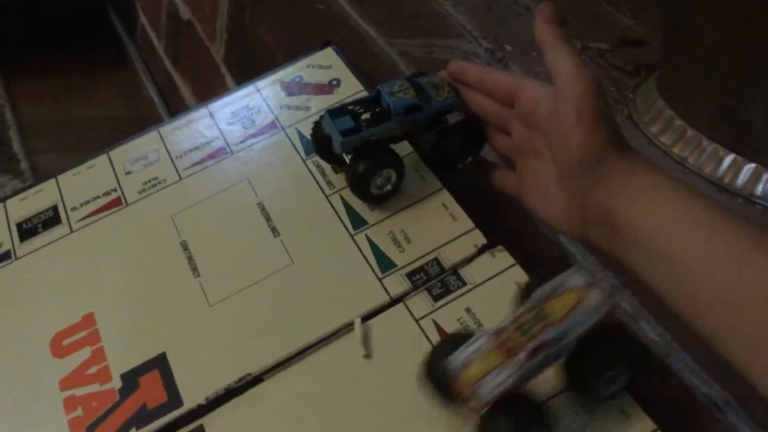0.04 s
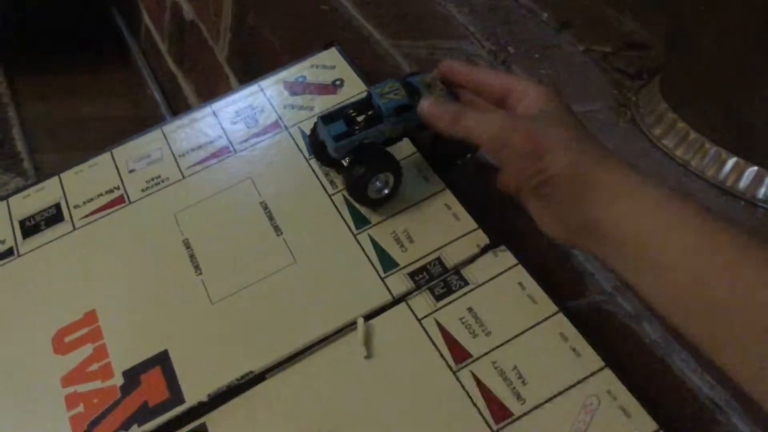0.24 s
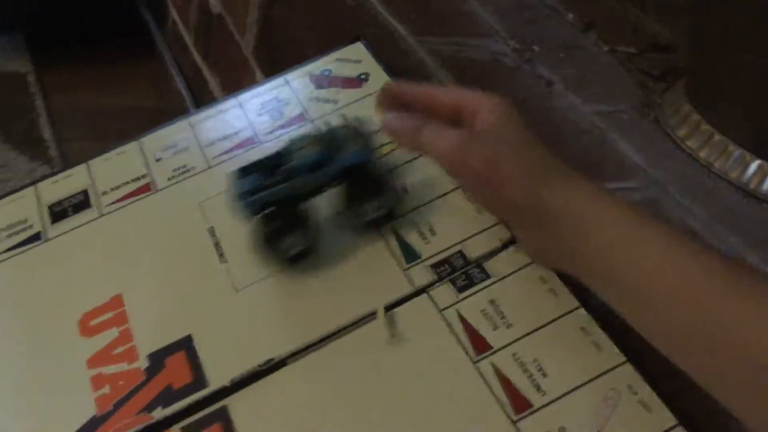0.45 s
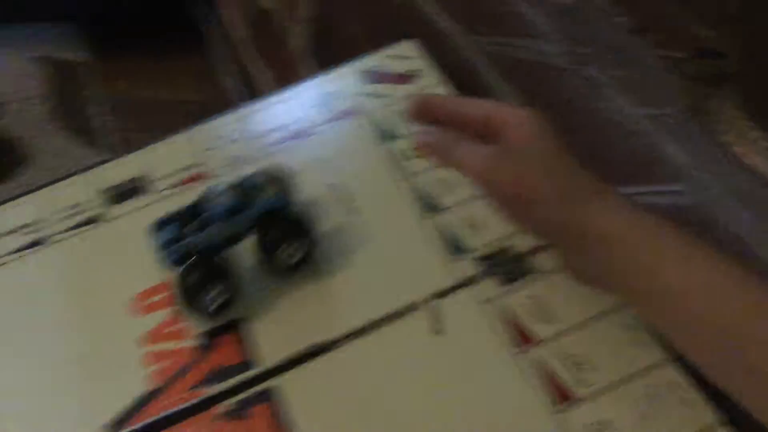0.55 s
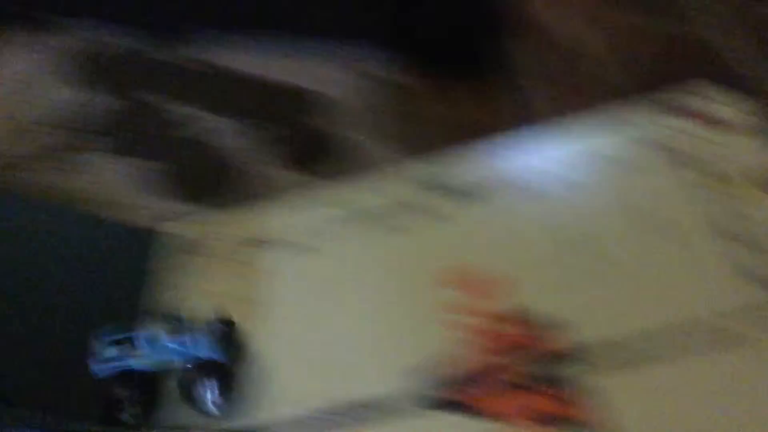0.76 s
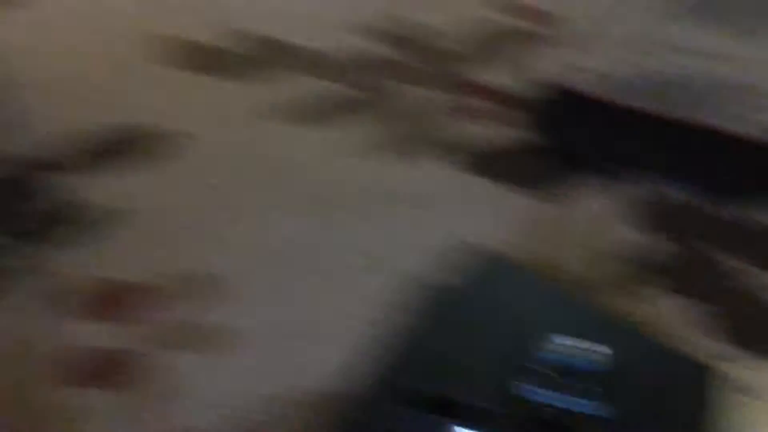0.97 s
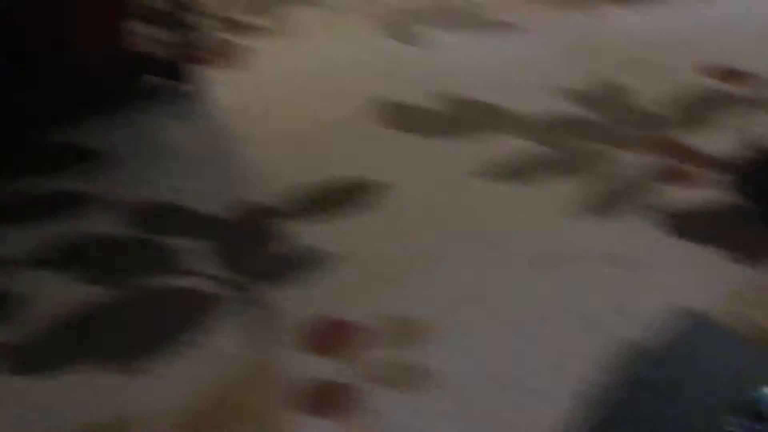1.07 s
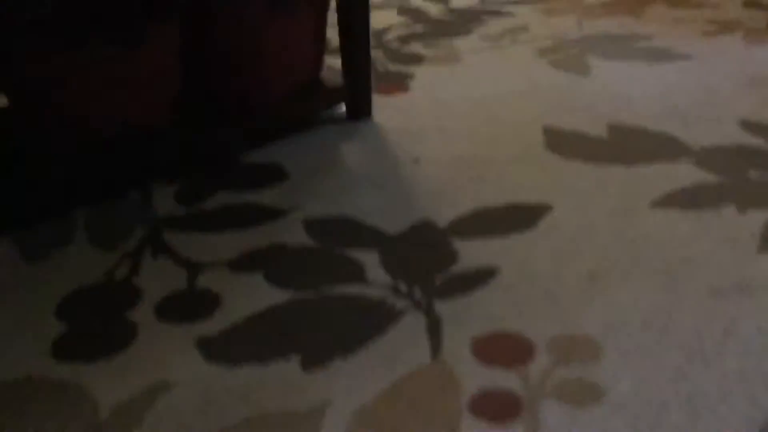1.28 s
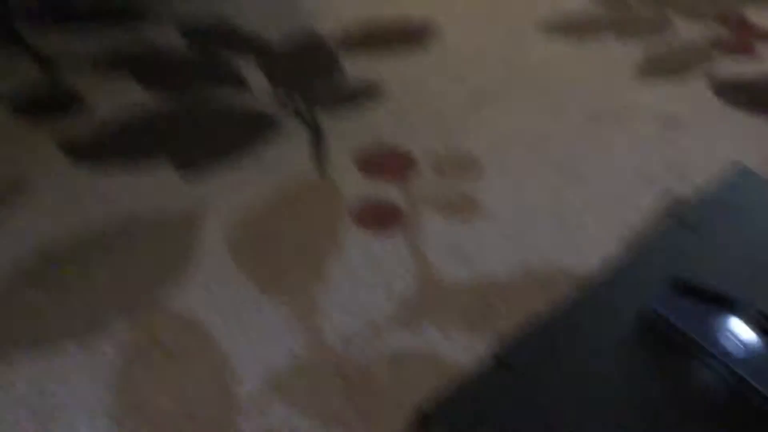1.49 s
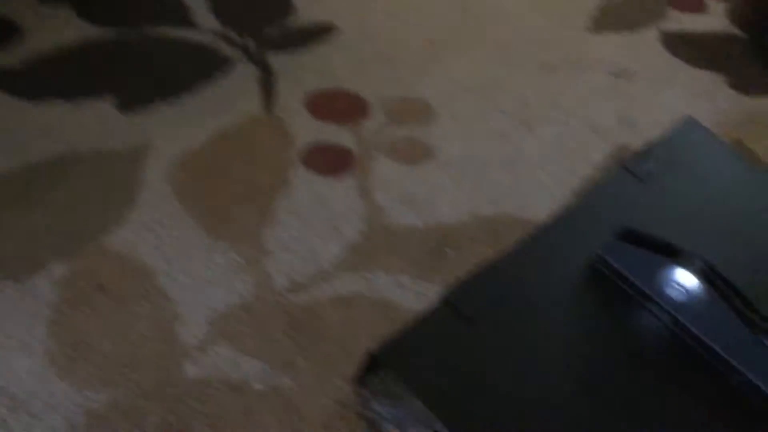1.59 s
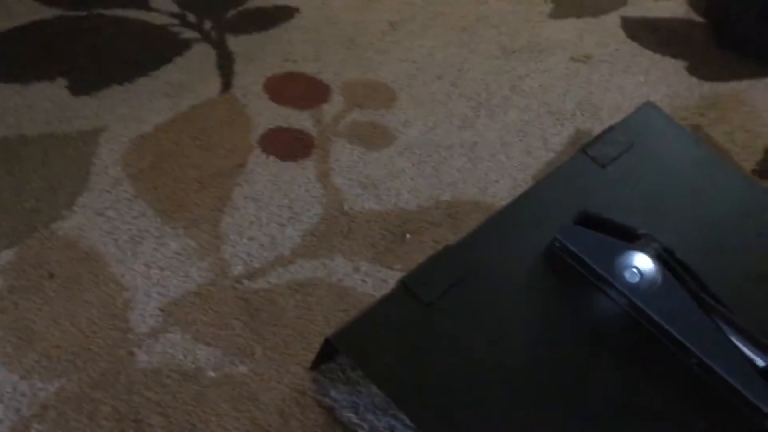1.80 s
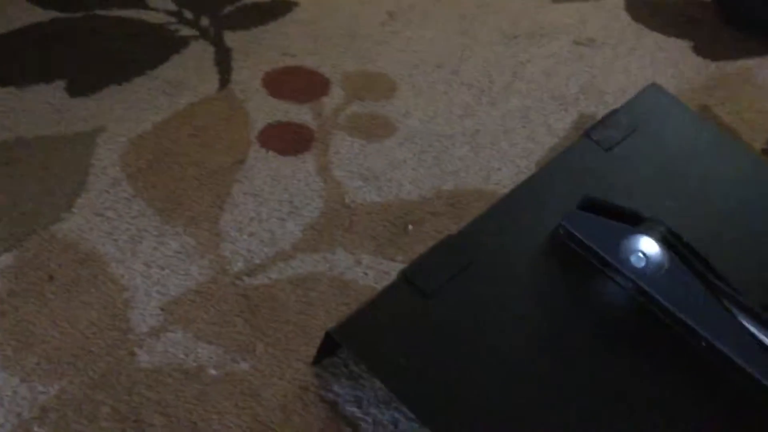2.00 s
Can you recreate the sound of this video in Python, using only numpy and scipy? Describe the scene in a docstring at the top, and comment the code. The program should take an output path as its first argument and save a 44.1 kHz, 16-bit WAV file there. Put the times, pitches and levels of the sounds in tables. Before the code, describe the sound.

Toy truck drumming and clattering down a cardboard slope, landing hard and bumping to a stop.

```python
"""In a small living room, a toy monster truck is let go on a sloping cardboard game board.
Its knobbly tyres drum on the board, plastic parts rattle and the loose steel axles jingle.
It clatters over the fold, crashes onto a hollow case whose modes ring, slows almost to rest,
rolls again and bumps to a stop. The room adds a short reverberation, quiet air and a faint hiss."""
import sys
import numpy as np
from scipy import signal
from scipy.fft import rfft, irfft, next_fast_len
from scipy.io import wavfile
from scipy.ndimage import uniform_filter1d

SR = 44100
rng = np.random.default_rng(int(sys.argv[2]) if len(sys.argv) > 2 else 0)


def log_audio(samples):
    """Write samples as a 16-bit WAV file to the path given in sys.argv[1]."""
    # one column per channel
    frames = np.atleast_2d(samples).T
    # limit to full scale, then quantise
    limited = np.clip(frames, -1, 1)
    pcm = np.round(limited * 32767).astype(np.int16)
    wavfile.write(sys.argv[1], SR, pcm)


N = 90404
RELEASE_S, LANDING_S = .17, .89

# impacts of the truck: start_s, thud_db, clack_db, tick_db
IMPACTS = [(0.086, -28, -80, -63), (.154, -23.5, -53, -69), (0.172, -55, -43.5, -46),
           (0.337, -13, -33.5, -43.5), (0.542, -42, -31, -47), (0.571, -18, -13, -26),
           (0.575, -46, -22, -28), (0.596, -11, -19, -31.5), (0.6148, -11.5, -20.5, -20.5),
           (0.628, -37, -20, -54), (0.653, -11.5, -36, -50.5), (0.763, -10, -52, -40),
           (0.8998, -26, -12, -19.5), (0.911, -41, -24, -35), (0.937, -35, -28, -24),
           (0.945, -27, -17.5, -22), (0.957, -15, -21, -26), (0.969, -28, -22, -24), (1.0, -38, -25, -24),
           (1.006, -36, -29, -26), (1.016, -44, -32, -25), (1.0798, -11, -20.5, -36),
           (1.09, -25, -20.5, -32), (1.1109, -23.5, -31.5, -30.5), (1.132, -38, -45, -32),
           (1.139, -31, -38, -32.5), (1.263, -26.5, -57, -40.5), (1.308, -35.5, -65, -50),
           (1.395, -51, -52.5, -48), (1.747, -33, -37, -56), (1.755, -12, -35, -41),
           (1.777, -28, -39.5, -58)]
# drumming of the tyres on the case: time_s, level_db
CASE_DRUMMING = [(.9, -25.5), (1.04, -30.5), (1.14, -31), (1.29, -41), (1.36, -55), (1.45, -56.5),
                 (1.53, -42), (1.66, -38.5), (1.78, -33.5), (1.84, -41), (1.9, -54), (2.05, -63.5)]
# shaking of the axles and loose parts: time_s, level_db
SHAKING = [(.16, -69), (.18, -48), (.35, -53.5), (.55, -51.5), (.62, -47), (.7, -41.5), (.8, -43.5),
           (.87, -49), (.98, -38), (1.06, -43), (1.14, -40.5), (1.22, -51.5), (1.34, -62), (1.5, -65.5),
           (1.72, -63), (1.85, -67.5)]
# spectrum of the case's lid, also of the noise in every thud: frequency_hz, level_db
LID_SPECTRUM = [(40, -63), (110, -39.5), (170, -5), (225, -6.5), (295, 3.5), (430, -4.5), (700, -17.5),
                (1200, -31), (2200, -36), (6000, -58)]


def impacts():
    """Impulse excitation: each blow thuds in the panel, clacks in the shell and ticks in the axles."""
    # low modes of a struck panel: pitch_hz, level_db, t60_s
    panel_modes = [(288, 0, .12), (330, -10, .07), (400, -9, .06)]
    # spectra of plastic on the board, plastic on the case and the axles: frequency_hz, level_db
    board_clack = [(60, -38), (450, 13), (780, 5.5), (1120, 13.5), (1400, 5.5), (1650, 4), (2100, 1),
                   (3100, -1), (5200, -10.5), (16000, -64)]
    case_clack = [(60, -26.5), (450, 18.5), (780, 7), (1080, 12.5), (1400, 2), (1800, 8.5), (2400, -3.5),
                  (3400, -4), (4500, -13), (16000, -17.5)]
    axle_tick = [(300, -23), (1500, 2.5), (3500, 0), (5200, -3), (7000, -2.5), (11500, -3.5), (13500, -6.5),
                 (16000, -21)]
    panel, board, case, metal = map(impulse_response, (LID_SPECTRUM, board_clack, case_clack, axle_tick))
    out, t = np.zeros(N), np.arange(SR // 4) / SR

    def burst(response, t60_s):
        noise = rng.standard_normal(len(t)) * amp(-60 * t / t60_s)
        return convolve(noise * onset(t, rise_s=.0004), response)

    for start_s, thud_db, clack_db, tick_db in IMPACTS:
        # the panel's pitch shifts with the place where it is struck
        modes = onset(t, rise_s=.0022) * damped_modes(panel_modes, vary_db=4.2, detune=.025)
        thud = amp(-4.5) * modes + amp(-13) * burst(panel, t60_s=.04)
        clack = burst(board if start_s < LANDING_S else case, t60_s=.07)
        tick = burst(metal, t60_s=.032)
        crack = amp(2.5) * burst(metal, t60_s=.0047)
        add(out, start_s, amp(thud_db) * thud + amp(clack_db) * clack + amp(tick_db) * (tick + crack))
    return out


def rolling():
    """Forced vibration: the tyres drive the board, whirring as they gather speed, then the case."""
    # drumming on the board and whirr of the tyres: time_s, level_db
    board_drumming = [(0, -66), (.11, -59), (.16, -39.5), (.2, -33), (.22, -24.5), (.36, -25), (.46, -22),
                      (.5, -28), (.56, -25), (.66, -20), (.74, -27), (.78, -24.5), (.88, -24)]
    whirring = [(.18, -70), (.44, -38), (.555, -35), (.6, -40.5), (.88, -40)]
    # their spectra: frequency_hz, level_db
    board_spectrum = [(40, -45), (80, -28), (120, -34), (165, -10), (215, -9), (290, 2), (335, 1.5),
                      (420, -7.5), (520, -12), (800, -23), (1200, -25.5), (2000, -44.5), (5000, -57)]
    whirr_spectrum = [(350, -26.5), (700, 5), (1200, -13), (1900, -20), (2500, -17), (3300, -36.5)]
    board = tyres(board_spectrum) * envelope(board_drumming)
    whirr = tyres(whirr_spectrum) * envelope(whirring)
    lid = tyres(LID_SPECTRUM) * envelope(CASE_DRUMMING)
    return (board + whirr) * on_board() + lid * (1 - on_board())


def tyres(spectrum):
    """Source and filter: tread impacts and rubber friction excite a panel, held at a steady level."""
    tread = impulse_train(per_s=170, scatter_db=1.5)
    scrub = .39 * rng.standard_normal(N)
    drumming = convolve(tread + scrub, impulse_response(spectrum))
    power = np.abs(uniform_filter1d(drumming ** 2, size=1800))
    return drumming / np.sqrt(power + 1e-9)


def case_resonance():
    """Energy balance: blows and rolling feed the case's modes, and each decays at its own rate."""
    # modes of the hollow case: pitch_hz, level_db, t60_s
    case_modes = [(209, -2, .2), (392, -2, .14), (563, -1, .3), (651, 2, .35), (797, -11, .28),
                  (909, -1, .45), (988, -6, .22), (1018, -5, .22), (1122, -6, .2), (1204, -8, .2),
                  (1313, -8, .38)]
    out, t = np.zeros(N), np.arange(N) / SR
    feed = (amp(-1.5) * envelope(CASE_DRUMMING) * (1 - on_board())) ** 2 / SR
    for start_s, _, clack_db, _ in IMPACTS:
        if start_s > LANDING_S:
            feed[round(start_s * SR)] += amp(clack_db - 13) ** 2
    width = SR // 400  # each blow's energy enters over 2.5 ms
    feed = signal.lfilter(np.ones(width) / width, [1], feed)
    for hz, db, t60_s in case_modes:
        energy = np.abs(signal.lfilter([1], [1, -amp(-60 / SR / t60_s) ** 2], feed))
        # the phase wanders about 1.4 radians within one decay time
        drift = 1.4 * np.cumsum(rng.standard_normal(N)) / np.sqrt(SR * t60_s)
        out += amp(db) * np.sqrt(energy) * np.sin(2 * np.pi * hz * t + drift)
    return out


def rattle():
    """Friction noise: loose plastic parts chatter, each tap a tiny decaying scrape."""
    # spectrum of the loose parts: frequency_hz, level_db
    spectrum = [(300, -21), (1100, 8.5), (2300, 3), (3700, 5), (5300, -4), (12000, -9.5), (16000, -24)]
    tap_s = .006
    taps = np.abs(impulse_train(per_s=150, scatter_db=4))
    decay = np.exp(-np.arange(SR // 20) / SR / tap_s)
    scrapes = convolve(taps, decay) * rng.standard_normal(N)
    return envelope(SHAKING) * unit_rms(convolve(scrapes, impulse_response(spectrum)))


def axle_jingle(taps=90, per_s=110):
    """Random excitation: the spinning axles jingle down the board as hard as they are shaken."""
    out = np.zeros(N)
    for start_s in RELEASE_S + np.cumsum(rng.gamma(2, .5, taps)) / per_s:
        pitch_hz = 3750 * np.exp(.08 * rng.standard_normal())
        gain = amp(np.interp(start_s, *np.transpose(SHAKING)) - 3.5)
        add(out, start_s, gain * axle_ring(pitch_hz, vary_db=4, detune=.035))
    return out


def axle_clinks():
    """Free vibration: an axle hits its stop and rings briefly."""
    # single clinks: start_s, favoured_pitch_hz, level_db
    clinks = [(.171, 4570, -48.5), (.171, 8900, -52), (.9, 11700, -50), (1.11, 6700, -32),
              (1.139, 8900, -58.5), (1.252, 5980, -45), (1.305, 3480, -55), (1.397, 3480, -58),
              (1.407, 5980, -52.5)]
    out = np.zeros(N)
    for start_s, pitch_hz, db in clinks:
        add(out, start_s, amp(db) * axle_ring(pitch_hz))
    return out


def axle_ring(pitch_hz, vary_db=0, detune=0):
    """Selective excitation: one tap on the axles favours the modes near the given pitch."""
    # modes of the steel axles and chassis: pitch_hz, level_db, t60_s
    axle_modes = [(2510, -5, .045), (3480, 0, .05), (3930, -2, .04), (4570, -3, .045), (5980, -8, .045),
                  (6700, -11, .045), (8900, -7, .055), (11700, -14, .03)]
    lift_db, log_width = 11, .06
    modes = [(hz, db + lift_db * np.exp(-(np.log(hz / pitch_hz) / log_width) ** 2), t60_s)
             for hz, db, t60_s in axle_modes]
    ring = damped_modes(modes, vary_db, detune)
    return ring * onset(np.arange(len(ring)) / SR, rise_s=.001)


def reverberation(x):
    """Diffuse field: the carpeted room returns a short tail with little bass, 5 ms late."""
    # reverberation time: frequency_hz, t60_s
    decay_times = [(200, 0.12), (1500, 0.25), (6000, 0.2), (15000, 0.14)]
    hz, t, noise = signal.stft(rng.standard_normal(SR // 2), SR, nperseg=256)
    decay = amp(-60 * t / at_frequency(decay_times, hz)[:, None])
    tail = signal.istft(noise * decay, SR, nperseg=256)[1]
    response = np.pad(tail, (SR // 200, 0)) / np.linalg.norm(tail)
    return low_cut(convolve(x, response), hz=400, order=2)


def background():
    """Filtered noise: steady room air, and a faint hiss that rises late in the run."""
    # spectra of air and hiss: frequency_hz, level_db
    air_spectrum = [(25, -6), (60, 16), (100, 15), (300, -7), (800, -14), (2300, -34), (9000, -22.5),
                    (16000, -64)]
    hiss_spectrum = [(300, -27), (1200, -9), (2300, 1.5), (3100, -9), (4300, -4), (6500, -15.5),
                     (10000, -31)]
    # rise of the hiss: time_s, level_db
    hiss_levels = [(1.3, -77), (1.6, -61), (2.05, -61)]
    air = convolve(rng.standard_normal(N), impulse_response(air_spectrum))
    hiss = convolve(rng.standard_normal(N), impulse_response(hiss_spectrum))
    return amp(-60) * air + envelope(hiss_levels) * hiss


def damped_modes(modes, vary_db, detune):
    """Modal sum: decaying cosines, scattered at each strike in level and in log pitch (detune)."""
    t = np.arange(SR // 4) / SR
    scatter = np.clip(rng.standard_normal((len(modes), 2)), -1.5, 1.5)
    return sum(amp(db + vary_db * a - 60 * t / t60_s) * np.cos(2 * np.pi * hz * np.exp(detune * b) * t)
               for (hz, db, t60_s), (a, b) in zip(modes, scatter))


def impulse_train(per_s, scatter_db, count=2000):
    """Shot noise: small contacts of uneven spacing and strength, rms 1."""
    at = (np.cumsum(rng.gamma(2, .5, count)) * SR / per_s).astype(int)
    strength = amp(scatter_db * np.clip(rng.standard_normal(count), -2, 2))
    strength *= rng.choice([-1, 1], count)
    return unit_rms(np.bincount(at[at < N], strength[at < N], N))


def impulse_response(spectrum, size=4096):
    """Minimum-phase response with the given spectral shape and energy 1."""
    magnitude = amp(at_frequency(spectrum, np.fft.rfftfreq(size, 1 / SR)))
    cepstrum = irfft(np.log(magnitude))
    cepstrum[1:size // 2] *= 2
    cepstrum[size // 2 + 1:] = 0
    response = irfft(np.exp(rfft(cepstrum)))
    return response / np.linalg.norm(response)


def on_board():
    """Crossfade: 1 on the board, falling to 0 as the truck lands on the case."""
    return np.interp(np.arange(N) / SR, [LANDING_S, LANDING_S + .02], [1, 0])


def onset(t, rise_s):
    """Exponential rise from 0 to 1."""
    return 1 - np.exp(-t / rise_s)


def envelope(points):
    """Gain per sample from (time_s, level_db) points."""
    return amp(np.interp(np.arange(N) / SR, *np.transpose(points)))


def at_frequency(points, hz):
    """Interpolate (frequency_hz, value) points on a log frequency axis."""
    frequencies, values = np.transpose(points)
    return np.interp(np.log(hz + 1), np.log(frequencies + 1), values)


def amp(db):
    """Decibels to gain."""
    return 10 ** (np.asarray(db) / 20)


def unit_rms(x):
    """Scale to rms 1."""
    return x / np.sqrt(np.mean(x ** 2) + 1e-20)


def convolve(x, response):
    """Pass x through an impulse response."""
    return signal.fftconvolve(x, response)[:len(x)]


def low_cut(x, hz, order):
    """High-pass filter."""
    return signal.sosfilt(signal.butter(order, hz, 'high', fs=SR, output='sos'), x)


def add(out, start_s, x):
    """Mix x into out from start_s."""
    part = out[round(start_s * SR):][:len(x)]
    part += x[:len(part)]


def scene():
    """Superposition: the truck, the ringing case, the truck's reverberation and the background."""
    truck = rolling() + rattle() + axle_jingle() + impacts() + axle_clinks()
    echo = amp(-6.5) * reverberation(truck)
    return (truck + case_resonance() + echo + background())[None]


def record(dry):
    """Band limiting: the microphone drops the deep bass and passes nothing above top_hz."""
    top_hz, size = 15950, next_fast_len(N + SR // 2)
    spectrum = rfft(low_cut(dry, hz=136, order=4), size)
    passband = np.fft.rfftfreq(size, 1 / SR) < top_hz
    return irfft(spectrum * passband, size)[..., :N]


dry = scene()
out = record(dry)
log_audio(out)
```